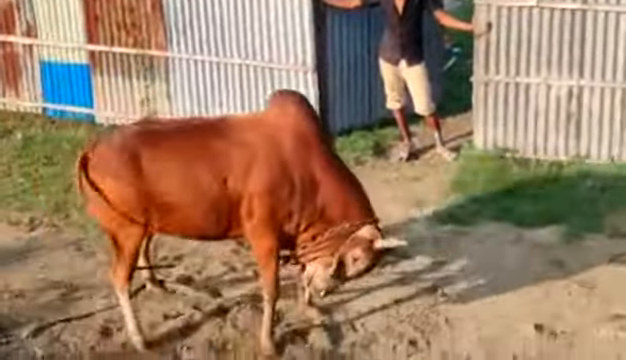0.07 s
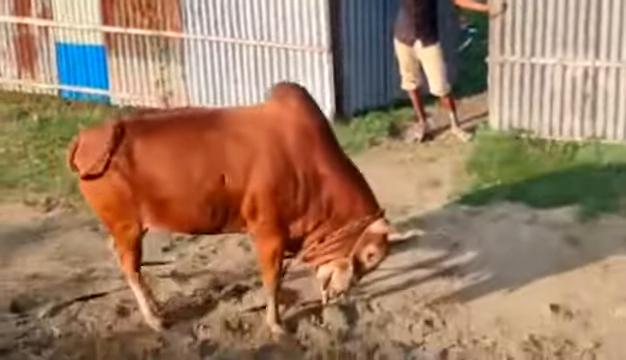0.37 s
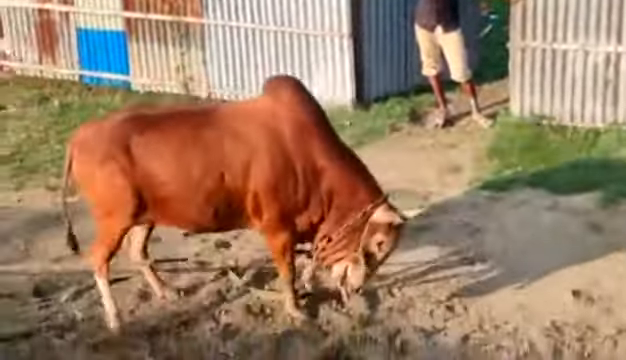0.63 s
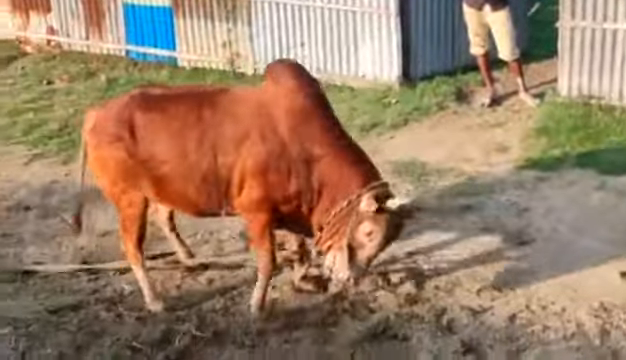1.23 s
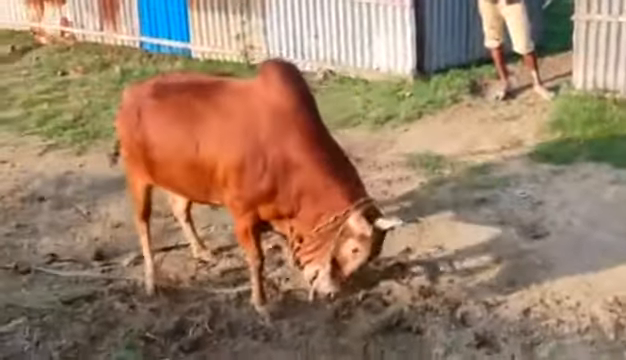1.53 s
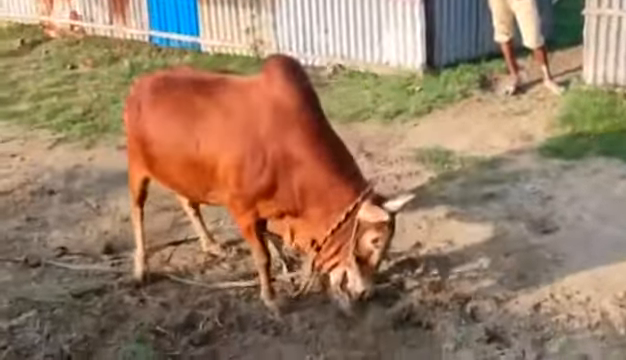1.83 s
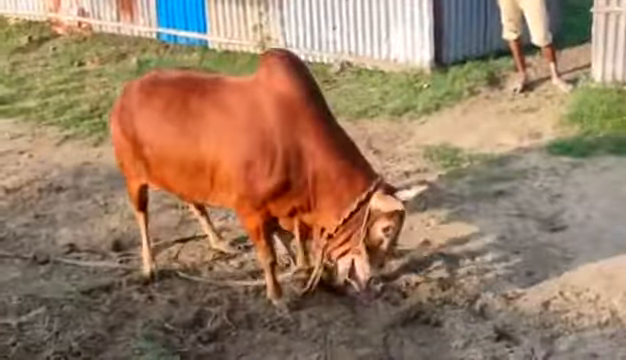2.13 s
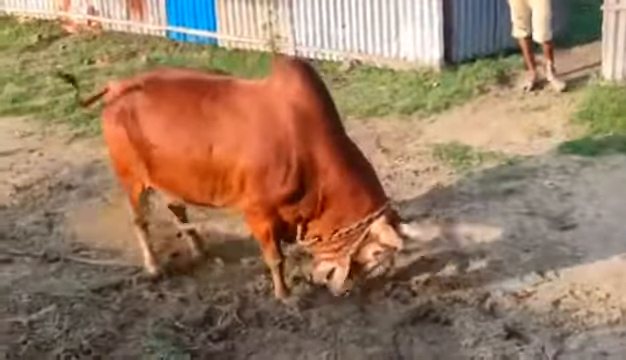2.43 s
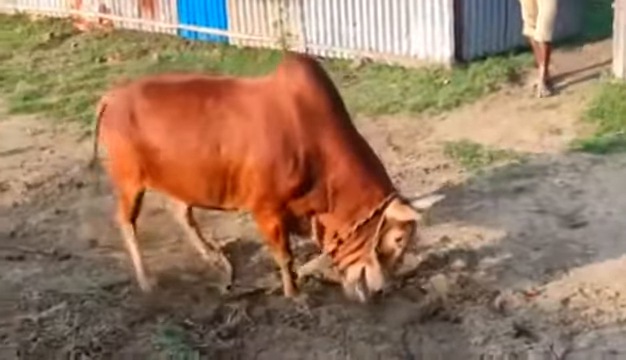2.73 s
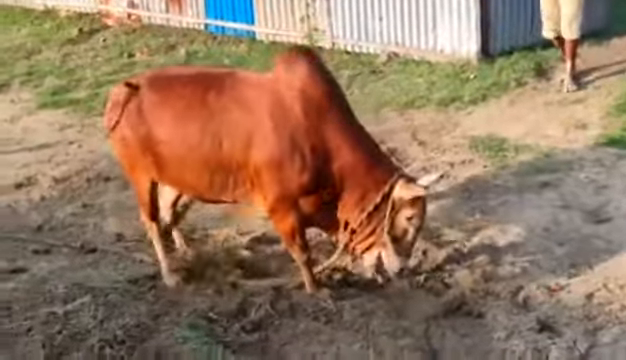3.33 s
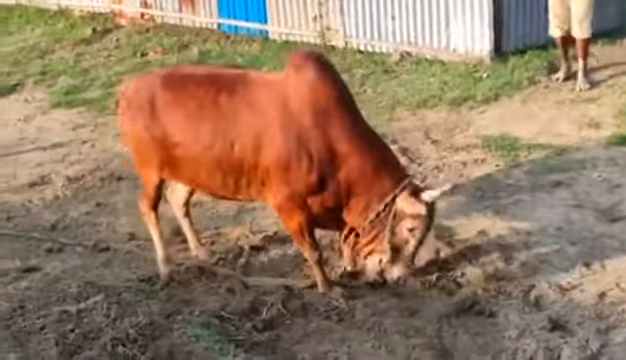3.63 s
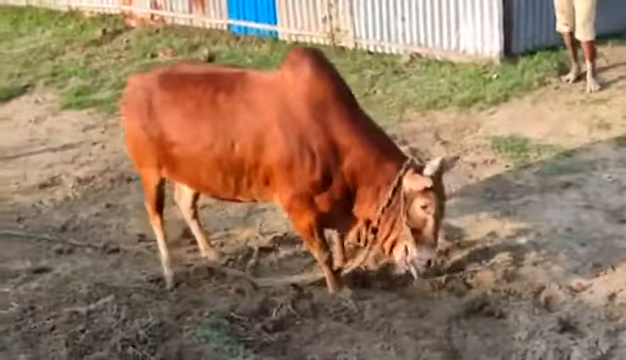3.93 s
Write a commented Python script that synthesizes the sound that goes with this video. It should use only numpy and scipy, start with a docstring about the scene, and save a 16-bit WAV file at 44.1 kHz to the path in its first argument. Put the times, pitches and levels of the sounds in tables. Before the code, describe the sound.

A bull gives one short, clear bellow, then three hoarse, rattling snorts with hissing nostrils, dragging air in between them. It is outdoors in a yard, with a slight echo off tin walls and a low hum underneath.

```python
"""A bull in a dirt yard

A bull, head down, gives one short clear bellow and three hoarse snorts, dragging air in between.
Throat pulses ring its chest and muzzle, the loudest cracking or knocking; its nose hisses and whistles.
Tin walls scatter the sound; a low hum and outdoor noise lie underneath."""
import sys
import numpy as np
from scipy import signal
from scipy.fft import rfft, irfft
from scipy.io import wavfile
from scipy.ndimage import uniform_filter1d

SR = 44100
rng = np.random.default_rng(int(sys.argv[2]) if len(sys.argv) > 2 else 0)


def wav_record(signal):
    """Record a signal, one row per channel, as 16-bit PCM in the file named by sys.argv[1]."""
    frames = np.transpose(np.atleast_2d(signal))
    bounded = np.clip(frames, -1, 1)
    # unit amplitude maps onto the largest positive 16-bit level
    quanta = np.round(bounded * 32767).astype(np.int16)
    wavfile.write(sys.argv[1], SR, quanta)


N = 176400

# The throat, one table per call. Each row: time in seconds, pulses per second, roughness from 0 to 1.
THROAT_BEATS = [
    [(0, 185.3, 0.02), (.045, 202.1, 0.09), (.075, 199.4, 0), (.125, 194.2, 0.12), (.19, 198.9, 0.07),
     (.235, 208.5, 0), (.31, 198.9, 0.11), (.375, 202, 0.07), (.415, 151.8, 0.26), (.48, 110, 0.5)],
    [(1.1945, 110.7, 0.16), (1.25, 108.5, 0.2), (1.291, 94, 0.22), (1.304, 58.4, 0.07), (1.35, 60.66, 0.09),
     (1.39, 231.7, 0.87), (1.44, 230.1, 0.83), (1.475, 266, 0.15), (1.52, 239.5, 0.77),
     (1.555, 163.4, 0.48), (1.6, 109.2, 0.21), (1.68, 110.7, 0.68)],
    [(2.161, 111.6, 0.1), (2.24, 111.3, 0.2), (2.246, 59.7, 0.03), (2.305, 62.16, 0), (2.33, 214.5, 0.69),
     (2.42, 224.3, 0.71), (2.47, 235.8, 0.09), (2.52, 131.7, 0.44), (2.565, 177.4, 0.56),
     (2.6, 128.8, 0.52), (2.66, 121.4, 0.95)],
    [(3.28, 297.5, 0.58), (3.41, 263.5, 0.38), (3.44, 129.7, 0.14), (3.47, 160.5, 0.4), (3.52, 214, 0.28),
     (3.59, 225.5, 0.31), (3.65, 208.6, 0.25), (3.71, 190.3, 0.18), (3.8, 139, 0.67)],
]
# Each row: time in seconds, then relative levels in dB of chest, muzzle, rushing air and hiss.
BELLOW_LEVELS = [(0.0, -19.5, -30, -38, -42), (0.05, -21.5, -29, -44, -45.5),
                 (0.07, -19.5, -28, -40, -37.5), (0.111, -21.5, -32.5, -42.5, -45),
                 (0.13, -25, -39.5, -38.5, -41.5), (0.25, -22, -36.5, -40.5, -44),
                 (0.288, -22.5, -36.5, -38, -38), (0.4, -28, -38, -39.5, -40),
                 (0.458, -42.5, -59, -47, -57), (0.48, -37, -45, -70, -53)]
# One table per snort, with the same columns as the bellow.
SNORT_LEVELS = [
    [(1.19, -64, -50, -53, -67), (1.24, -31, -43.5, -38, -49.5), (1.278, -23.5, -28, -36, -47),
     (1.334, -31.5, -33, -31, -39.5), (1.372, -43, -35.5, -33, -37.5), (1.408, -34, -30.5, -34, -44.5),
     (1.426, -27, -34, -41.5, -44), (1.474, -24, -28, -38.5, -41.5), (1.498, -28.5, -33.5, -37.5, -38.5),
     (1.55, -26, -39, -40.5, -41.5), (1.65, -42.5, -45.5, -50, -56), (1.68, -37, -52, -54, -64)],
    [(2.16, -65, -52, -53, -64), (2.202, -40, -43, -35.5, -47.5), (2.23, -24.5, -35, -35.5, -42.5),
     (2.266, -24.5, -31, -28.5, -42), (2.272, -28, -27, -36, -38.5), (2.32, -26.5, -37, -34, -36.5),
     (2.348, -31, -29.5, -34.5, -37), (2.38, -32, -47, -36.5, -31.5), (2.44, -25, -33, -35, -34.5),
     (2.472, -20.5, -36, -38.5, -36.5), (2.503, -26.5, -38.5, -37, -36), (2.568, -23.5, -49, -37.5, -41.5),
     (2.61, -36, -48.5, -41, -48.5), (2.66, -52, -84, -64, -63)],
    [(3.28, -32, -63, -55, -42), (3.296, -42, -42, -37.5, -42), (3.34, -28, -30.5, -43, -55),
     (3.408, -35.5, -28, -33.5, -45), (3.458, -19.5, -28.5, -37.5, -41.5), (3.494, -25, -38, -48, -42.5),
     (3.524, -21, -29.5, -42, -41.5), (3.572, -20, -32.5, -44, -47.5), (3.612, -21, -40.5, -42.5, -44.5),
     (3.664, -25.5, -38.5, -39.5, -42), (3.746, -36, -46, -41, -50), (3.8, -68, -66, -66, -73)],
]
# The tone of fine nostril spray. Each row of any tone table: frequency in Hz, relative level in dB.
SPRAY_TONE = [(6000, -39), (9000, 9), (11000, 2.5), (13000, -2.5)]
TIME = np.arange(N) / SR
EAR_LAG_S = 0.0002  # the left ear hears the bull this much later
CHEST_DB, CHEST_BREATH = 2, 0.28


def amp(db):
    """Turn decibels into a gain."""
    return 10 ** (np.asarray(db) / 20)


def curve(rows, column=1):
    """Join one column of a table with straight lines in time."""
    rows = np.array(rows, float)
    return np.interp(TIME, rows[:, 0], rows[:, column])


def unit(x):
    """Scale a signal to an average power of 1."""
    return x / np.sqrt(np.mean(x ** 2) + 1e-18)


def even(x, size=1500):
    """Hold a signal's power near 1 from moment to moment."""
    power = uniform_filter1d(uniform_filter1d(x ** 2, size), size)
    return x / np.sqrt(np.abs(power) + 1e-9)


def colour(x, tone):
    """Filter a sound by a tone table, so that it rings after each pulse and never before."""
    n = x.shape[-1]
    size = 2 * n
    hz, db = np.array(tone, float).T
    freqs = np.maximum(np.arange(n + 1) * SR / size, 1)
    cepstrum = irfft(np.log(amp(np.interp(np.log(freqs), np.log(hz), db))))
    cepstrum[1:n] *= 2  # move the early half of the ringing to after the pulse
    cepstrum[n + 1:] = 0
    return irfft(rfft(x, size) * np.exp(rfft(cepstrum)))[..., :n]


def walk(hz):
    """Wander smoothly at random; more Hz means faster."""
    size = max(int(SR / hz), 1)
    return unit(uniform_filter1d(uniform_filter1d(rng.standard_normal(N), size), size))


def shimmer(x, depth_db=3, width_hz=260):
    """Narrow resonances come and go, as when wet nostrils change shape."""
    freqs, _, spectrum = signal.stft(x, SR, nperseg=1024)
    patches = uniform_filter1d(rng.standard_normal(spectrum.shape[1:]), int(width_hz / freqs[1]), axis=0)
    patches = uniform_filter1d(patches, size=6, axis=1)
    return signal.istft(spectrum * amp(depth_db * unit(patches)), SR, nperseg=1024)[1][:, :N]


def air(tone, shared=0.15, flutter_db=1.76, flutter_hz=50):
    """Swirling air makes a fluttering noise, partly shared by the two ears."""
    own, common = rng.standard_normal((2, N)), rng.standard_normal(N)
    common = np.array([np.roll(common, int(EAR_LAG_S * SR)), common])
    noise = np.sqrt(1 - shared) * own + np.sqrt(shared) * common
    return unit(colour(shimmer(noise), tone)) * amp(flutter_db * walk(flutter_hz))


def swell(calls, part):
    """Follow the loudness of one part through the given calls, with soft edges."""
    column = 1 + ["chest", "muzzle", "rush", "hiss"].index(part)
    level = 0
    for rows in calls:
        sounding = 1. * ((TIME >= rows[0][0]) & (TIME <= rows[-1][0]))
        level = level + amp(curve(rows, column)) * uniform_filter1d(sounding, size=1300)
    return level


def pulses(rows, jitter=0.33, scatter_db=10, limp_db=3):
    """The throat snaps shut again and again; roughness scatters the timing and size of the pulses."""
    hz, rough = curve(rows), np.clip(curve(rows, column=2), 0, 1)
    cycles = np.cumsum(hz * ((TIME >= rows[0][0]) & (TIME < rows[-1][0]))) / SR
    at = np.flatnonzero(np.diff(np.ceil(cycles), prepend=0))
    slip, size = rng.standard_normal((N // 100, 2))[:len(at)].T
    place = np.clip(at + jitter * rough[at] * slip * SR / hz[at], 0, N - 1)
    limp = limp_db * (-1) ** np.arange(len(at))  # every other pulse is weaker in a hoarse growl
    beat = np.zeros(N)
    np.add.at(beat, place.astype(int), amp(rough[at] * (scatter_db * size + limp)))
    return beat


def throat(puff_s=0.01):
    """Each throat pulse lets out a puff of air that quickly dies away."""
    beat = sum(pulses(rows) for rows in THROAT_BEATS)
    puff = even(signal.lfilter([1], [1, -np.exp(-1 / (puff_s * SR))], beat + 1e-18))
    return beat, puff


def ring(beat, puff, tone, breath):
    """Pulses and puffs ring a hollow of the body; a rough throat adds more breath noise."""
    hoarse = 0.55 + curve(sum(THROAT_BEATS, []), column=2)
    breath_noise = even(colour(puff * rng.standard_normal(N), tone))
    return even(even(colour(beat, tone)) + breath * hoarse * breath_noise)


def bellow(beat, puff, breath=0.58, muzzle_db=6.5):
    """Mostly even pulses with little breath ring chest and muzzle in one clear call."""
    # How chest and muzzle ring in the bellow. Each row: frequency in Hz, level in dB.
    chest_tone = [(40, -26), (110, -3.5), (200, 1.5), (290, 1.5), (400, -16), (500, -5.5), (750, -26.5),
                  (1500, -61), (5000, -74)]
    muzzle_tone = [(150, -43), (400, 4), (500, 3), (600, 7), (700, -16), (810, -1), (900, 2), (1000, -4),
                   (1220, -0.5), (1400, -38), (1700, -16.5), (2100, -19), (2600, -27), (6000, -67)]
    chest = ring(beat, puff, chest_tone, CHEST_BREATH * breath)
    muzzle = even(shimmer(ring(beat, puff, muzzle_tone, breath)[None])[0])
    return (chest * swell([BELLOW_LEVELS], "chest") * amp(CHEST_DB)
            + muzzle * swell([BELLOW_LEVELS], "muzzle") * amp(muzzle_db))


def out_breaths(puff, rush_db=3, hiss_db=1.5):
    """Air rushes and hisses out of the nostrils in every call, throbbing with the puffs."""
    # The tones of the escaping air. Each row: frequency in Hz, level in dB.
    snort_rush_tone = [(300, -24), (900, 5), (1450, 3.5), (1750, 6), (2400, 4.5), (3400, 2), (4200, -2),
                       (5200, -21), (9000, -69)]
    bellow_rush_tone = [(300, -38), (1500, -7.5), (2050, -0.5), (2650, -2.5), (3400, 1.5), (4000, -12),
                        (5200, -10.5), (9000, -35)]
    hiss_tone = [(1500, -4), (3500, 5), (5000, 1.5), (6200, 1.5), (7800, 4), (9000, -2), (10000, -23.5),
                 (13000, -20)]
    # Fine spray in the bellow and in each snort, in dB relative to its hiss.
    spray_db = [-31, -11, -13.5, -13.5]
    calls = [BELLOW_LEVELS] + SNORT_LEVELS
    rush = air(snort_rush_tone) * swell(SNORT_LEVELS, "rush")
    rush += air(bellow_rush_tone) * swell([BELLOW_LEVELS], "rush") * amp(-0.5)
    hiss = air(hiss_tone) * swell(calls, "hiss")
    hiss += air(SPRAY_TONE) * sum(amp(db) * swell([rows], "hiss") for rows, db in zip(calls, spray_db))
    # A steady flow is added to the puffs; the hiss gets more of it and so throbs less.
    return amp(rush_db) * rush * even(puff + 0.99) + amp(hiss_db) * hiss * even(puff + 3.2)


def yard_walls(x, lag_s=EAR_LAG_S, echo_s=0.12, echo_db=-7.5):
    """The sound reaches the right ear first, then scatters off the tin walls."""
    # The tone of the echo. Each row: frequency in Hz, level in dB.
    wall_tone = [(100, 4.5), (250, -35), (500, -4), (1000, 7), (2000, 9.5), (8000, 7)]
    echo = colour(rng.standard_normal((2, N)) * amp(-60 * TIME / echo_s) * (TIME > .004), wall_tone)
    echo /= np.sqrt(np.sum(echo ** 2, axis=1, keepdims=True))
    direct = np.array([np.interp(TIME - lag_s, TIME, x), x])
    return direct + amp(echo_db) * signal.fftconvolve(x[None], echo, axes=1)[:, :N]


def background(noise_db=-40):
    """Outdoor noise, low wavering hums and a faint dry rustle fill the yard."""
    # Tones of the noise, its left-right spread and the rustle. Each row: frequency in Hz, level in dB.
    yard_tone = [(15, -40), (25, -19.5), (59, -3), (141, -8), (219, -1.5), (257, -10), (308, -11.5),
                 (342, -15), (433, -15), (878, -22.5), (1300, -23.5), (1520, -28.5), (2310, -27),
                 (3000, -37), (13000, -61.5)]
    side_tone = [(30, -10), (70, -4.5), (200, -12.5), (500, -6.5), (1100, 4), (10000, -2)]
    rustle_tone = [(1000, -65), (1900, 10.5), (2450, 9), (3000, -0.5), (4500, -28)]
    # The hums. Each row: pitch in Hz, speed of wavering in Hz, level in dB.
    hums = [(65, 13.7, -49), (165.3, 23, -50), (227.3, 15.6, -47.5)]
    # The rustle's loudness. Each row: time in seconds, level in dB.
    rustle_levels = [(0, -54), (.7, -45.5), (.9, -48), (1.15, -52.5), (1.6, -51), (2.1, -81), (2.9, -67),
                     (4, -74)]
    middle, side = unit(colour(rng.standard_normal((2, N)), yard_tone))
    noise = (middle + colour(side, side_tone) * np.array([[1], [-1]])) * amp(noise_db + walk(9.6))
    hum = 0
    for hz, waver_hz, db in hums:
        phase = 2 * np.pi * hz * TIME
        hum = hum + amp(db) * unit(walk(waver_hz) * np.cos(phase) + walk(waver_hz) * np.sin(phase))
    return noise + hum + air(rustle_tone) * amp(curve(rustle_levels))


def in_breaths(air_db=4.2, throat_db=-3.5, pitch_sag=0.92, roughness=0.1):
    """Air is dragged in through the nose, brightest at full flow, with a wheeze from the throat."""
    # Each row: start, full flow, start of fade and end in seconds; relative rush, hiss and spray in dB;
    # wheeze pitch in Hz; relative wheeze in dB; a factor that shifts the nose's resonances.
    breaths = [(0.46, 0.658, 0.69, 0.9, -36, -39.5, -58.5, 128.7, -31, 1),
               (1.56, 1.778, 1.852, 1.957, -40.5, -52, -66.5, 177.5, -56, 0.82),
               (2.988, 3.184, 3.264, 3.456, -37.5, -36.5, -58, 208.3, -41, 0.98)]
    # The tones of an in-breath. Each row: frequency in Hz, level in dB.
    rush_tone = [(200, -15), (450, -10.5), (850, 1.5), (1400, -3), (2100, 1), (2800, 3), (3800, 0.5),
                 (4800, -8), (9000, -55)]
    hiss_tone = [(1500, -8), (3200, 7), (5000, 4), (6200, 3.5), (7800, 5), (9300, -3.5), (10300, -35),
                 (13000, -27)]
    wheeze_tone = [(60, -54), (130, 3), (260, 1), (330, -4.5), (405, 1.5), (520, -7.5), (820, -13),
                   (1300, -31), (4000, -32), (12000, -68)]
    rush = hiss_level = spray_level = wheeze = 0
    for start, full, fading, end, rush_db, hiss_db, spray_db, hz, wheeze_db, shift in breaths:
        flow = curve([(start, 0), (full, 1), (fading, 1), (end, 0)]) ** 1.54
        rush += flow * amp(rush_db) * air([(f * shift, db) for f, db in rush_tone])
        hiss_flow, wheeze_flow = flow ** 1.17, flow ** 0.68  # hiss peaks more sharply than the wheeze
        hiss_level += hiss_flow * amp(hiss_db)
        spray_level += hiss_flow * amp(spray_db)
        pitches = [(start, hz * pitch_sag), (full, hz), (fading, hz), (end, hz * pitch_sag)]
        beat = pulses([(when, pitch, roughness) for when, pitch in pitches])
        wheeze += even(colour(beat, wheeze_tone)) * wheeze_flow * amp(wheeze_db)
    intake = rush + hiss_level * air(hiss_tone) + spray_level * air(SPRAY_TONE)
    return amp(air_db) * intake + amp(throat_db) * yard_walls(wheeze)


def snorts(beat, puff, muzzle_db=3, sag=0.706, glide_s=0.055, hold_s=0.075):
    """Ragged pulses ring chest and muzzle; the chest's ring sinks as each snort runs out."""
    # How chest and muzzle ring in a snort. Each row: frequency in Hz, level in dB.
    chest_tone = [(40, -74), (75, -11), (115, -1), (200, -2.5), (280, 1.5), (370, -6.5), (445, 2.5),
                  (520, -11.5), (750, -27), (1500, -54), (5000, -99)]
    muzzle_tone = [(150, -31), (400, 0.5), (590, -0.5), (720, 2), (880, 1), (1030, 5.5), (1240, 0),
                   (1430, -15.5), (1650, -5), (2000, -17), (2400, -32), (6000, -65)]
    ends = [rows[-1][0] for rows in SNORT_LEVELS]
    spent = sum(curve([(end - hold_s - glide_s, 0), (end - hold_s, 1), (end, 1), (end + glide_s, 0)])
                for end in ends)
    full_chest = ring(beat, puff, chest_tone, CHEST_BREATH)
    sunk_chest = ring(beat, puff, [(hz * sag, db) for hz, db in chest_tone], CHEST_BREATH)
    chest = even((1 - spent) * full_chest + spent * sunk_chest)
    muzzle = ring(beat, puff, muzzle_tone, breath=1)
    return (chest * swell(SNORT_LEVELS, "chest") * amp(CHEST_DB)
            + muzzle * swell(SNORT_LEVELS, "muzzle") * amp(muzzle_db))


def rattle_cracks_and_knocks(rasp_s=0.0032):
    """The loudest pulses of the throat's rattle crack sharply or knock low in the chest."""
    # Each row: start in seconds, click level in dB, level of its short rasp in dB, ring pitch in Hz.
    loud_pulses = [(1.2795, -15, -31, 620), (1.3003, -11, -25, 1650), (1.318, -24, -23, 1900),
                   (1.334, -22, -24, 1700), (1.419, -20, -28, 1150), (2.2595, -14, -25, 2500),
                   (2.2742, -13, -24, 1150), (2.4595, -16, -32, 480), (2.516, -16, -36, 400),
                   (3.41, -22, -24, 1950), (3.428, -19, -22, 1600), (3.4505, -14, -26, 1500),
                   (3.4765, -16, -34, 450)]
    # The tone these pulses share. Each row: frequency in Hz, level in dB.
    pulse_tone = [(60, -24), (200, -6), (500, 2), (800, -5), (2000, -2), (3400, -4), (5000, -20),
                  (13000, -46)]
    # Each pulse's own ring. Each row: multiple of its pitch, level in dB.
    ring_shape = [(.3, 0), (.75, 1), (1, 7), (1.3, 0), (4, -10)]
    age = TIME[:4096]
    tick = colour(1. * (age == 0), pulse_tone)
    sound = np.zeros(N)
    for start, click_db, rasp_db, hz in loud_pulses:
        click = colour(tick, [(hz * multiple, db) for multiple, db in ring_shape])
        burst = rng.standard_normal(len(age)) * np.exp(-age / rasp_s)
        rasp = signal.fftconvolve(burst, click)[:len(age)] / np.linalg.norm(click)
        crack = amp(click_db) * click / np.abs(click).max() + amp(rasp_db) * rasp
        sound += np.interp(TIME - start, age, crack, left=0, right=0)
    return sound


def nose_whistles(waver_hz=58):
    """The nose gives brief breathy whistles and hollow hoots, some sliding in pitch."""
    # Each row: middle and spread in seconds, pitch in Hz, slide in Hz per second, level in dB.
    whistles = [(1.403, .006, 2890, 2, -27.5), (1.412, 0.013, 1114, -900, -24),
                (1.452, .006, 2970, 0, -29.5), (3.361, .018, 990, -800, -26),
                (3.412, 0.016, 1232, 900, -25.5), (3.453, 0.0045, 2920, 0, -25.5),
                (3.51, .006, 2974, 0, -26), (3.557, 0.013, 940, -5500, -28), (1.31, 0.022, 505, 0, -28),
                (1.553, .011, 486, -2000, -24), (2.49, 0.042, 454, -700, -25)]
    sound = np.zeros(N)
    for middle, spread, hz, slide, db in whistles:
        offset = TIME - middle
        level = amp(db) * np.exp(-(offset / spread) ** 2 / 2)
        phase = 2 * np.pi * (hz + slide * offset / 2) * offset
        sound += level * np.sin(phase + walk(waver_hz))
    return sound


def scene():
    """The bull calls and breathes in its yard."""
    beat, puff = throat()
    calls = yard_walls(bellow(beat, puff) + snorts(beat, puff)) + out_breaths(puff)
    accents = yard_walls(rattle_cracks_and_knocks() + nose_whistles(), lag_s=0.0001)
    return calls + accents + in_breaths() + background()


def record(dry, top_hz=13300):
    """Give each ear a slightly different tone and cut the highest treble."""
    # The balance between the ears. Each row: frequency in Hz, left minus right in dB.
    balance = [(30, 7.5), (60, 3), (150, 0), (600, 0), (1100, 0.5), (2100, 3.5), (4000, -0.5), (5500, -7.5),
               (7800, 1.5), (13000, 0)]
    left = colour(dry[0], [(hz, db / 2) for hz, db in balance])
    right = colour(dry[1], [(hz, -db / 2) for hz, db in balance])
    treble_cut = signal.ellip(10, .2, 80, top_hz, fs=SR, output="sos")
    return signal.sosfilt(treble_cut, np.array([left, right]))


dry = scene()
out = record(dry)
wav_record(out)
```